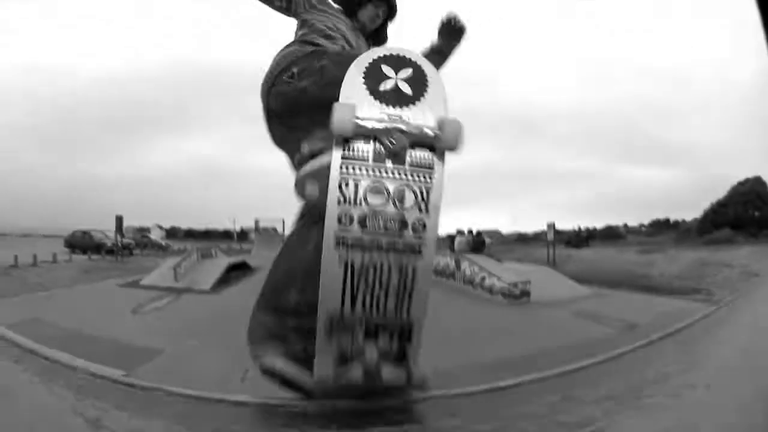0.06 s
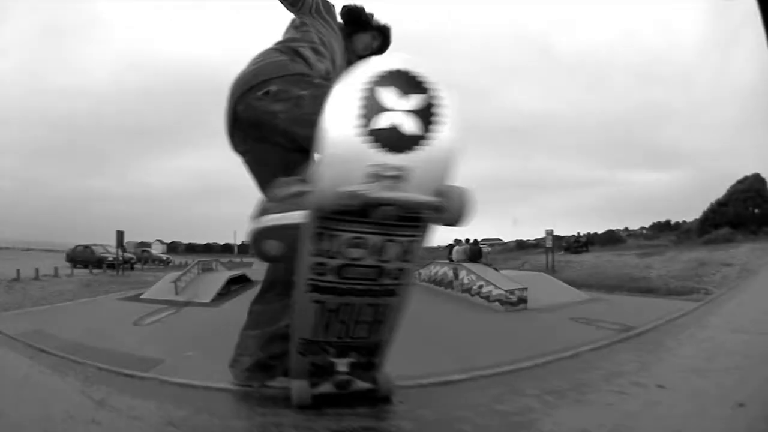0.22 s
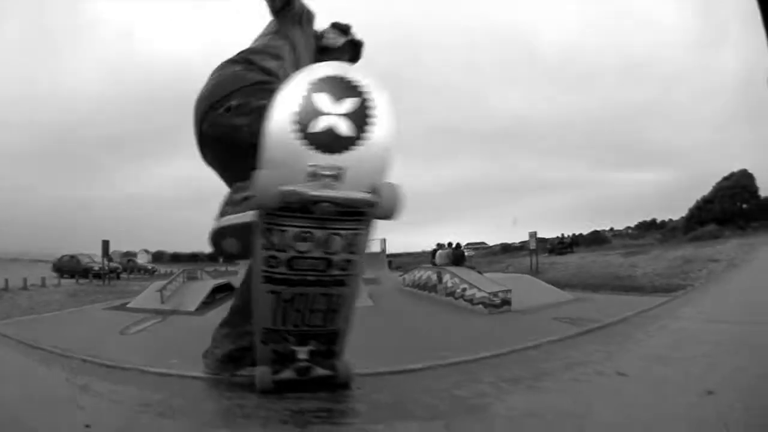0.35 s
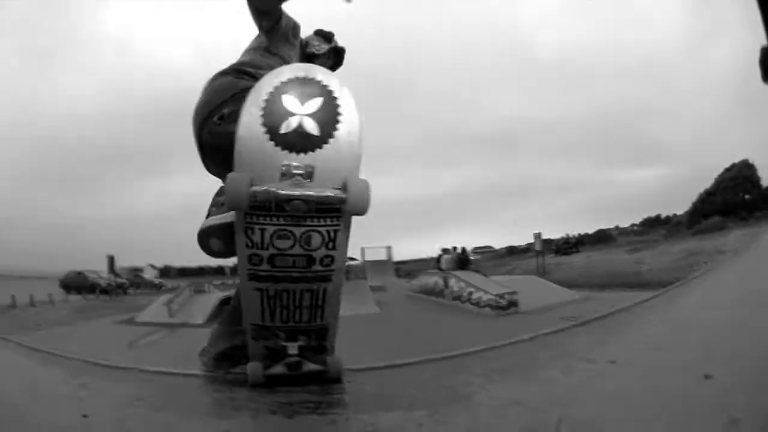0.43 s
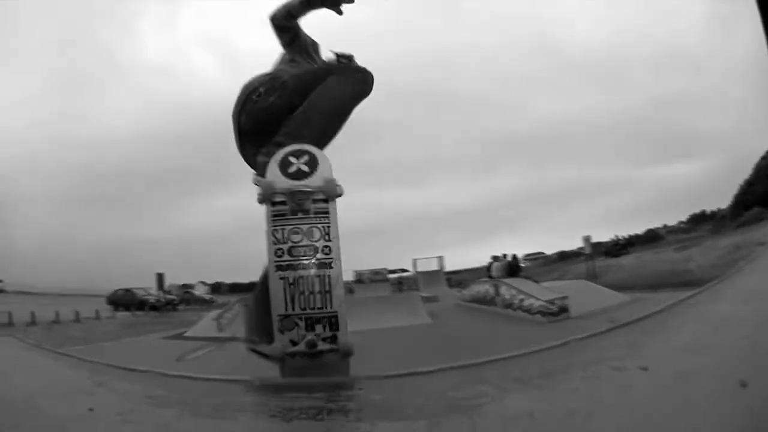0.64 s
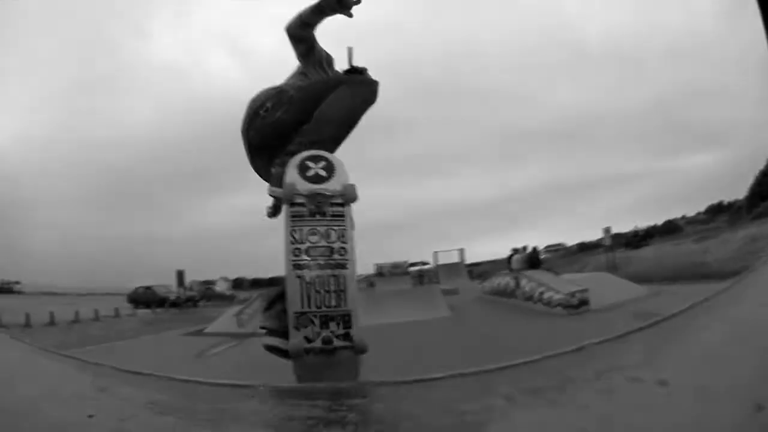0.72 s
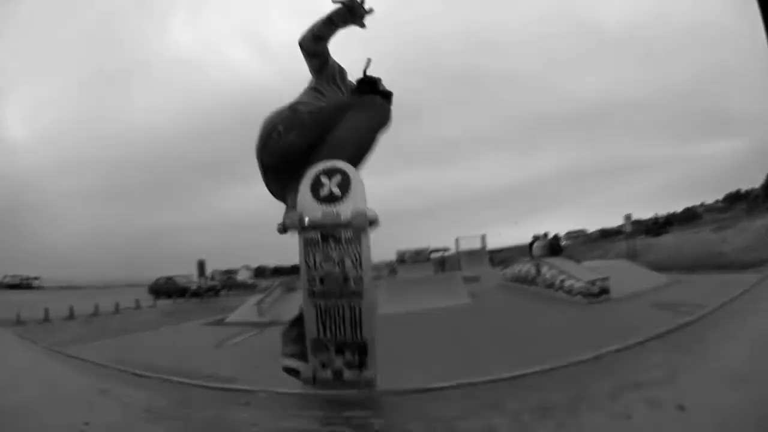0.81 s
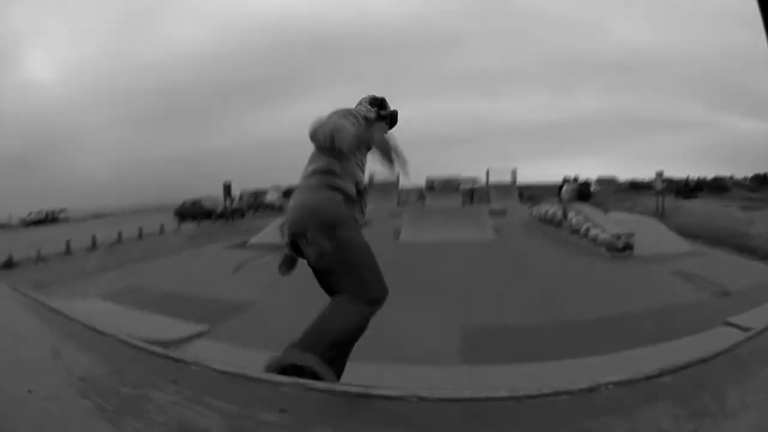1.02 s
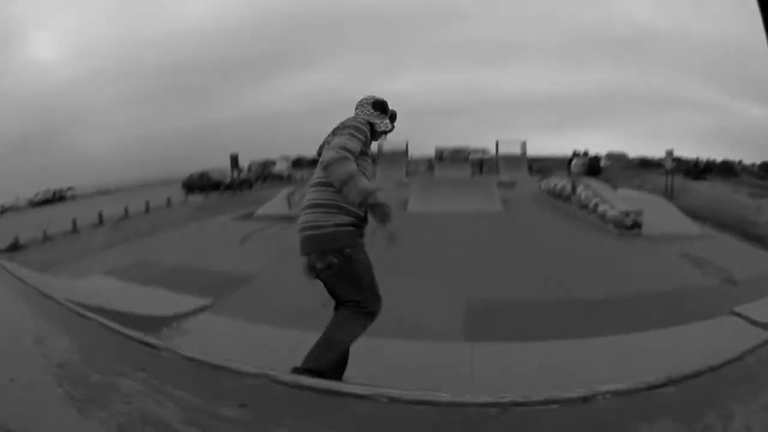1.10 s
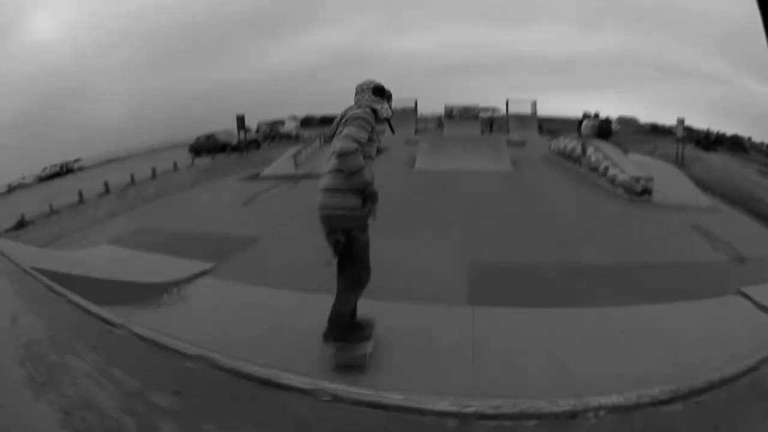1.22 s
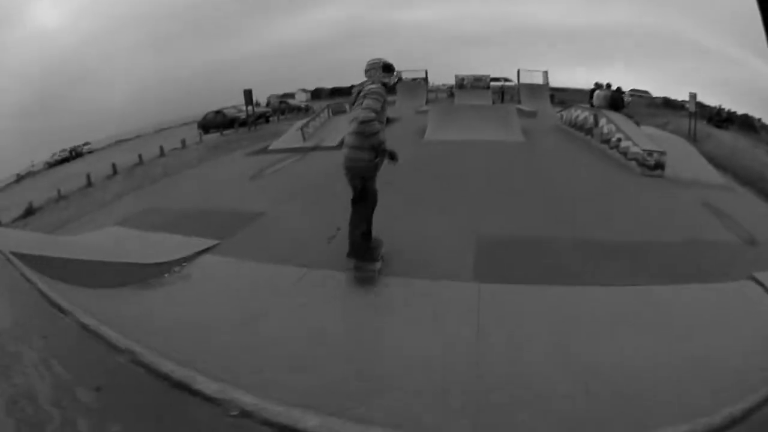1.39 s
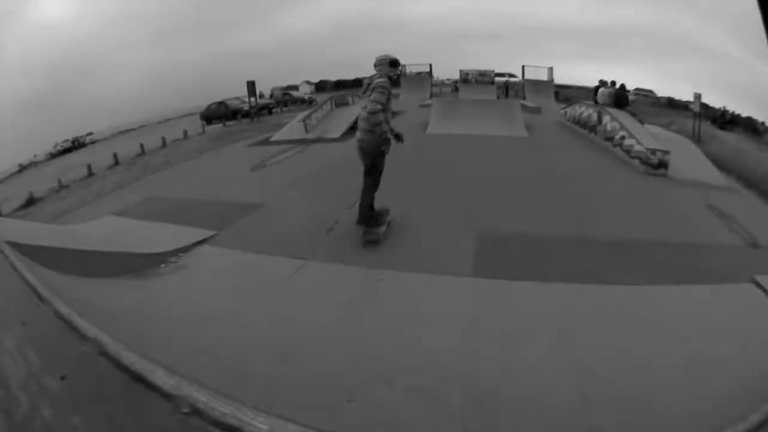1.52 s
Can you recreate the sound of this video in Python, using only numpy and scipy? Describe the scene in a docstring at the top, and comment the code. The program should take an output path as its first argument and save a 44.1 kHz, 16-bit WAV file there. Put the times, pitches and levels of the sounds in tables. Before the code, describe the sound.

At an outdoor skatepark, a skateboard clacks loudly against a nearby ramp edge and stalls with a thin wheel hiss. It cracks off, lands with a slap and rolls on over concrete, with faint wind on the microphone.

```python
"""A skateboard rolls up a ramp close by, knocks against the edge and stalls there.
Shoes and wheels scuff while the lifted front wheels spin with a thin hiss. The tail pops off,
the wheels drop back, the nose slaps down and the board rolls away over joints in the concrete.
Each blow makes the wooden deck and its axles ring and clatter, and the loudest blows overload
the microphone. Faint wind blows across it throughout."""
import sys
import numpy as np
from scipy import signal
from scipy.fft import rfft, irfft
from scipy.io import wavfile

SR = 44100
rng = np.random.default_rng(int(sys.argv[2]) if len(sys.argv) > 2 else 0)


def persist_wave(psi):
    """Save psi, clipped to +-1, as 16-bit WAV."""
    counts = np.round(np.clip(psi, -1, 1) * 32767).astype(np.int16)
    wavfile.write(sys.argv[1], SR, np.atleast_2d(counts).T)


N = 68355
T = np.arange(N) / SR
HIT_T = T[:8192]  # seconds since a hit began
TREBLE_LIMIT_HZ = 11950


def amp(db):
    """Turns decibels (dB) into a number to multiply a sound by."""
    return 10 ** (np.asarray(db) / 20)


def add(mix, start_s, sound):
    """Adds a sound to the mix at its start time."""
    part = mix[max(round(start_s * SR), 0):][:len(sound)]
    part += sound[:len(part)]


def fade(t, fade_s):
    """A fade that drops by 60 dB every fade_s seconds."""
    return np.exp(-np.log(1000) * t / fade_s)


def coloured(noise, tone, tilt_db=0):
    """Shapes noise to a tone table, brightens it by tilt_db per octave and sets its strength to 1."""
    hz = np.fft.rfftfreq(len(noise), 1 / SR) + 1
    tone_hz, tone_db = np.transpose(tone)
    octave = np.log2(np.clip(hz, tone_hz[0], tone_hz[-1]))
    gain = amp(np.interp(octave, np.log2(tone_hz), tone_db) + tilt_db * octave)
    treble_cut = 1 / (1 + (hz / TREBLE_LIMIT_HZ) ** 40)
    shaped = irfft(rfft(noise) * gain * treble_cut, len(noise))
    return shaped / np.sqrt(np.mean(shaped ** 2) + 1e-20)


def dying_noise(tone, fade_s, damping, tilt_db=0, t=HIT_T):
    """Countless weak notes struck at once. fade_s holds at 1000 Hz; damping shortens the high ones."""
    spectrum = rfft(coloured(rng.standard_normal(len(t)), tone, tilt_db))
    octave = np.log2((np.fft.rfftfreq(len(t), 1 / SR) + 1) / 1000)
    centres = np.arange(-2, 5, 2)  # octaves from 1000 Hz
    out = np.zeros(len(t))
    for centre in centres:
        band = irfft(spectrum * np.interp(octave, centres, 1. * (centres == centre)), len(t))
        out += band * fade(t, fade_s * 2 ** (-damping * centre))
    return out


def grains(per_second=11000, spread_db=2):
    """A thick stream of tiny contacts, all different in size."""
    clicks = rng.standard_normal(N) * (rng.random(N) < per_second / SR)
    return clicks * amp(spread_db * np.minimum(rng.exponential(1, N), 4))


# How loud the rolling is. Each row: time in seconds, rumble level in dB, grit level in dB.
ROLL_LEVELS = [(0, -41.5, -49), (.08, -41.5, -50.5), (0.191, -57, -51), (.24, -39, -37),
               (.30, -48.5, -51.5), (0.502, -68.5, -64.5), (.75, -65, -51), (.86, -64.5, -64.5),
               (1.028, -71, -70), (1.039, -43, -46), (1.087, -47, -49), (1.125, -32, -59),
               (1.24, -39.5, -53), (1.31, -37, -47), (1.55, -39.5, -43.5)]
# The tone of the rumble and of the grit. Each row: frequency in Hz, level in dB.
RUMBLE_TONE = [(30, -22), (70, -3.5), (140, -2.5), (170, 7), (205, -1.5), (300, -5.5), (395, 0),
               (480, -4.5), (780, -10.5), (1000, -23.5), (5000, -48)]
GRIT_TONE = [(200, -28.5), (600, 6.5), (2300, .5), (5000, -5), (11500, -12.5)]

def rolling():
    """The ground shakes the deck into a low rumble while grit crackles under the wheels."""
    times, rumble_db, grit_db = np.transpose(ROLL_LEVELS)
    rumble = amp(np.interp(T, times, rumble_db)) * coloured(grains(), RUMBLE_TONE)
    grit = amp(np.interp(T, times, grit_db)) * coloured(grains(), GRIT_TONE)
    return rumble + grit


# How loud the gusts are. Each row: time in seconds, level in dB.
GUST_LEVELS = [(0, -74), (.18, -46.5), (.27, -47.5), (.78, -63), (.97, -68), (1.19, -44), (1.55, -65)]
# The tone of the gusts and of the hush. Each row: frequency in Hz, level in dB.
GUST_TONE = [(20, -2), (55, 2.5), (120, -1), (500, -40.5)]
HUSH_TONE = [(250, 1.5), (500, -10), (900, -2.5), (1600, -10), (11500, -25)]

def wind(hush_db=-58):
    """Low gusts hit the microphone over a steady outdoor hush."""
    gusts = amp(np.interp(T, *np.transpose(GUST_LEVELS))) * coloured(rng.standard_normal(N), GUST_TONE)
    hush = amp(hush_db) * coloured(rng.standard_normal(N), HUSH_TONE)
    return gusts + hush


# How loud the spinning front wheels are. Each row: time in seconds, level in dB.
SPIN_LEVELS = [(.1, -60), (.3, -56.5), (.62, -57), (1.03, -71.5)]
# The tone of their hiss. Each row: frequency in Hz, level in dB.
SPIN_TONE = [(1700, -18.5), (2250, 2.5), (5200, -11), (6200, 1.5), (7000, -6.5), (9800, -5.5),
             (11500, -20.5)]

def bearings():
    """The bearings of the lifted wheels make a thin hiss that fades as they slow."""
    return amp(np.interp(T, *np.transpose(SPIN_LEVELS))) * coloured(grains(), SPIN_TONE)


# Wheels hitting the ramp and the joints. Each row: start in seconds, level in dB,
# brightness in dB per octave, ringing note in Hz, that note's extra level in dB.
WHEEL_BUMPS = [(.036, -31.5, 2, 1036, 5), (.057, -21.5, 0.26, 147, -3), (.133, -36.5, 2, 600, -1),
               (0.245, -28, 2, 420, 4), (0.2716, -21, 0, 433.6, 2.5), (1.0321, -18.5, 0.14, 548, 0.5),
               (1.0522, -21, -0.4, 247, -1), (1.2765, -24.5, -1, 180, -1.5), (1.2919, -27.5, -0.5, 346, -9),
               (1.4799, -32.5, -1, 710, -2), (1.5115, -26, -0.3, 163, 5), (1.526, -26.5, -0.45, 333, 5)]
# The tone of a thud. Each row: frequency in Hz, level in dB.
THUD_TONE = [(60, -11.5), (220, 3.5), (1050, -3.5), (1500, -12), (2300, -12.5), (4300, -20.5),
             (11500, -26.5)]

def bumps(fade_s=0.055, rise_s=0.00079):
    """Soft wheels send thuds into the deck, and each thud brings out one ringing note."""
    t, out = HIT_T, np.zeros(N)
    for start_s, db, tilt_db, hz, ring_db in WHEEL_BUMPS:
        ring = amp(ring_db) * np.sin(2 * np.pi * hz * t) * fade(t, fade_s)
        thud = dying_noise(THUD_TONE, fade_s, damping=0.18, tilt_db=tilt_db)
        add(out, start_s, amp(db) * (thud + ring) * np.minimum(t / rise_s, 1))
    return out


def blow(hit, notes, clatter_tone, ring_s, clatter_s, damping, rise_s):
    """A hard hit rings and clatters. ring_s and clatter_s hold at 1000 Hz; higher sounds die sooner."""
    start_s, db, clatter_db, tilt_db = hit
    t, out = HIT_T, np.zeros(N)
    ring = np.zeros(len(t))
    for k, (hz, note_db) in enumerate(notes):
        octave = np.log2(hz / 1000)
        note = np.sin(2 * np.pi * hz * t) * fade(t, ring_s * 2 ** (-damping * octave))
        ring += (-1) ** k * amp(db + note_db + tilt_db * octave) * note  # every other note is flipped
    clatter = amp(db + clatter_db) * dying_noise(clatter_tone, clatter_s, damping, tilt_db)
    add(out, start_s, (ring + clatter) * np.minimum(t / rise_s, 1))
    return out


# Knocks on the edge. Each row: start in seconds, level in dB, the clatter's extra level in dB,
# brightness in dB per octave.
KNOCK_HITS = [(0.2029, 1.5, -5.5, -0.5), (0.2187, -14.5, 0, -3)]
# A knock's ringing notes and the tone of its clatter. Each row: frequency in Hz, level in dB.
KNOCK_NOTES = [(255, -19), (305, -14.5), (415, -10.5), (646, -4.5), (851, -16.5), (1058, -9), (1475, -11),
               (1622, -16), (2051, -12.5), (2400, -19.5), (2680, -25), (2907, -24.5), (3601, -14.5),
               (3845, -13), (4350, -16.5), (5340, -27.5), (5860, -14.5)]
KNOCK_TONE = [(110, -8), (180, -11.5), (350, -4), (4500, 0.5), (8000, -9), (11500, -10)]

def edge_knock():
    """The wooden deck and an axle strike the edge of the ramp."""
    return sum(blow(hit, KNOCK_NOTES, KNOCK_TONE, ring_s=0.045, clatter_s=0.051,
                    damping=0.24, rise_s=0.00064) for hit in KNOCK_HITS)


# Short rubs. Each row: loudest moment in seconds, length in seconds, level in dB.
SCUFF_SWELLS = [(0.26, 0.04, -30), (0.356, 0.016, -39.5), (0.599, 0.022, -44.5), (0.761, 0.12, -46)]
# The tone of the rubbing. Each row: frequency in Hz, level in dB.
SCUFF_TONE = [(80, -9.5), (280, 10.5), (800, 0.5), (4500, -18), (6500, -10), (11500, -15.5)]

def scuffs():
    """Shoes and wheels rub in short swells while the board balances."""
    swells = sum(amp(db) * np.exp(-(2 * (T - peak_s) / length_s) ** 2)
                 for peak_s, length_s, db in SCUFF_SWELLS)
    return swells * coloured(grains(), SCUFF_TONE)


# The tail's one hit: start in seconds, level in dB, the clatter's extra level in dB,
# brightness in dB per octave.
POP_HIT = (.6857, -1.5, -19.5, 0)
# The pop's ringing notes and the tone of its clatter. Each row: frequency in Hz, level in dB.
POP_NOTES = [(228, -29.5), (334, -25), (492, -19), (815, -18.5), (1304, -13.5), (1600, -19.5), (1830, -18),
             (2400, -15), (4590, -23), (6300, -19.5)]
POP_TONE = [(100, -5.5), (550, -11.5), (1700, -2), (3400, 2), (4100, -12), (9000, -6.5), (11500, -17)]

def tail_pop():
    """The tail pops off the ramp with a sharp crack whose high notes die quickly."""
    return blow(POP_HIT, POP_NOTES, POP_TONE, ring_s=0.038, clatter_s=0.084,
                damping=0.74, rise_s=0.00014)


# The landing and a faint echo of it off the ground just after. Each row: start in seconds, level in dB, the
# clatter's # extra level in dB, brightness in dB per octave.
SLAP_HITS = [(1.0955, 1.5, -9.5, 0), (1.1113, -28, 0.5, -0.5)]
# A slap's ringing notes and the tone of its clatter. Each row: frequency in Hz, level in dB.
SLAP_NOTES = [(206, -13.5), (296, -11.5), (645, -10), (768, -5.5), (937, -40), (1180, -22.5), (1725, -21.5),
              (2150, -10), (3250, -9), (3470, -9.5), (4700, -24), (6250, -18.5)]
SLAP_TONE = [(60, -2), (200, 5.5), (1500, -0.5), (3500, 2), (7000, -16), (11500, -20)]

def nose_slap():
    """The nose drops, so the front wheels slap the ground, and a faint echo of the slap follows."""
    return sum(blow(hit, SLAP_NOTES, SLAP_TONE, ring_s=0.028, clatter_s=0.04,
                    damping=0.21, rise_s=0.0015) for hit in SLAP_HITS)


# The tone of the echoes. Each row: frequency in Hz, level in dB.
ECHO_TONE = [(800, 4), (3400, 3), (6500, -9)]

def echoes(sound, fade_s, rise_s):
    """Sound bounces off concrete and ramps and blurs into a short tail."""
    t = T[:SR // 2]
    tail = dying_noise(ECHO_TONE, fade_s, damping=0.1, t=t) * np.minimum(t / rise_s, 1)
    return signal.fftconvolve(sound, tail / np.linalg.norm(tail))[:N]


def scene(echo_db=-37.5, near_echo_db=-26.5, phase_shift=0.078, left_db=0.36):
    """Mixes board, echoes and wind a little to the left, with both channels almost alike."""
    board = rolling() + bearings() + bumps() + edge_knock() + scuffs() + tail_pop() + nose_slap()
    middle = board + amp(echo_db) * echoes(board, fade_s=0.38, rise_s=0.02) + wind()
    # Waves reach the microphone's two openings slightly out of step; near echoes add more width.
    side = phase_shift * signal.hilbert(middle).imag
    side += amp(near_echo_db) * echoes(middle, fade_s=0.04, rise_s=0.0005)
    return np.array([(middle + side) * amp(left_db), (middle - side) * amp(-left_db)])


def record(dry, ceiling=0.95, low_cut_hz=38):
    """The microphone drops the deepest bass, overloads on the hardest blows and loses the top treble."""
    bass_cut = signal.butter(2, low_cut_hz, "highpass", fs=SR, output="sos")
    trimmed = signal.sosfilt(bass_cut, dry)
    squashed = trimmed / (1 + (trimmed / ceiling) ** 6) ** (1 / 6)
    treble_cut = signal.firwin(101, TREBLE_LIMIT_HZ, window=("kaiser", 7), fs=SR)
    return signal.oaconvolve(squashed, treble_cut[None], "same")


dry = scene()
out = record(dry)
persist_wave(out)
```